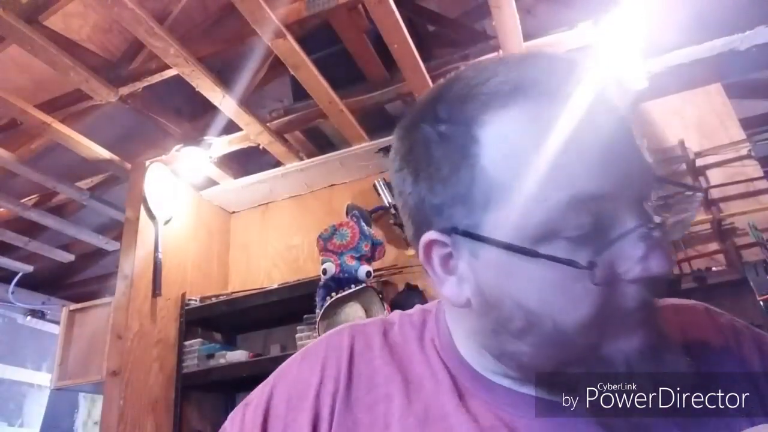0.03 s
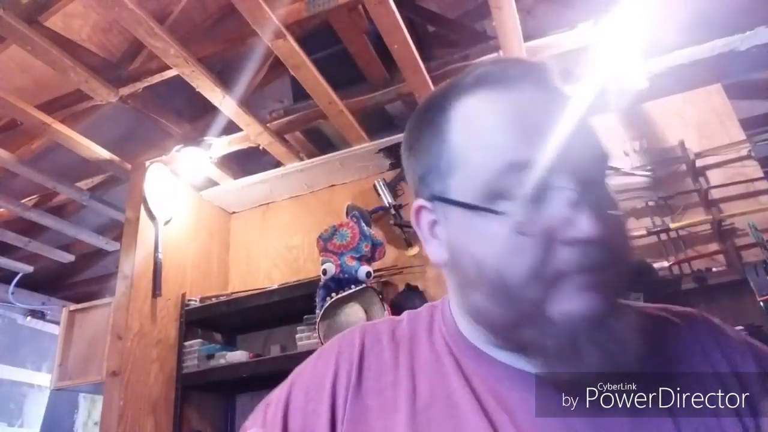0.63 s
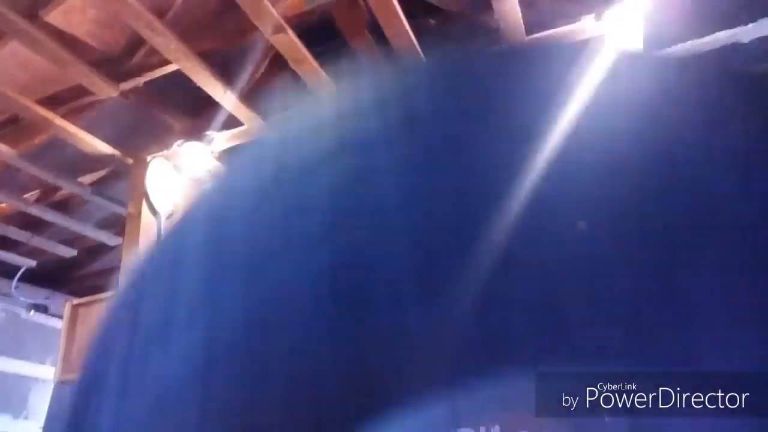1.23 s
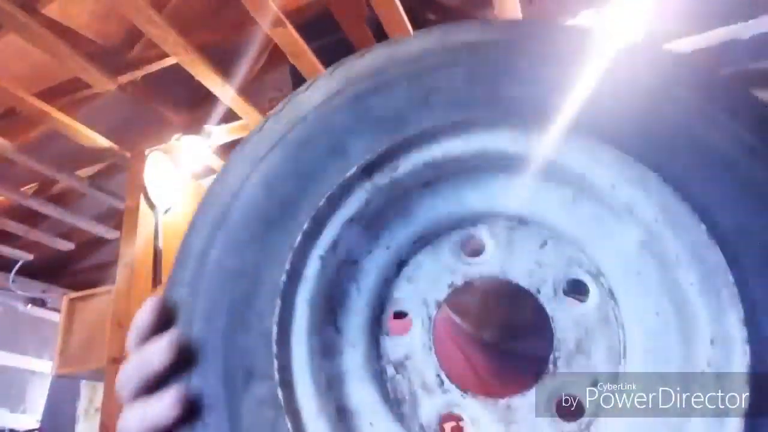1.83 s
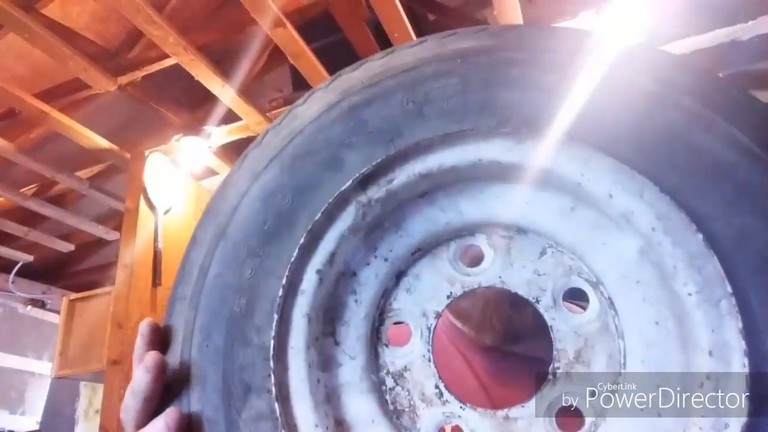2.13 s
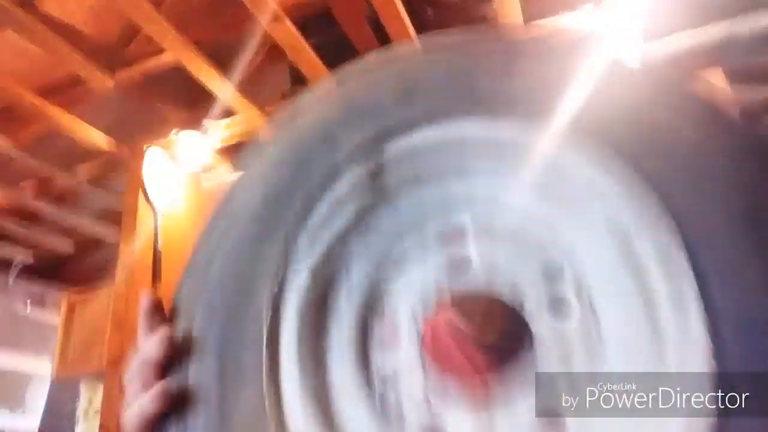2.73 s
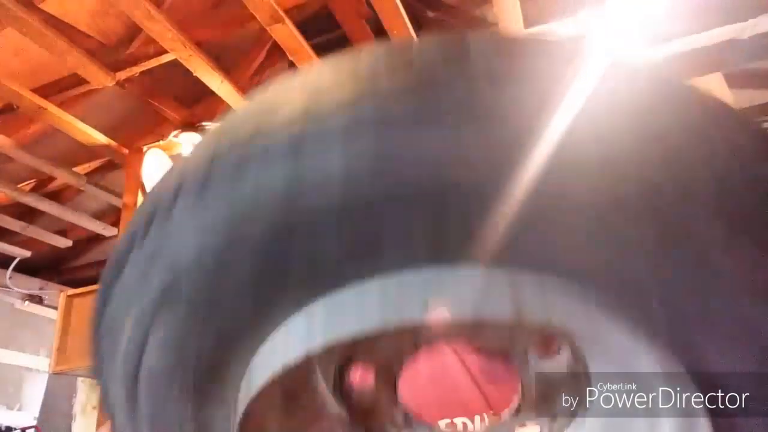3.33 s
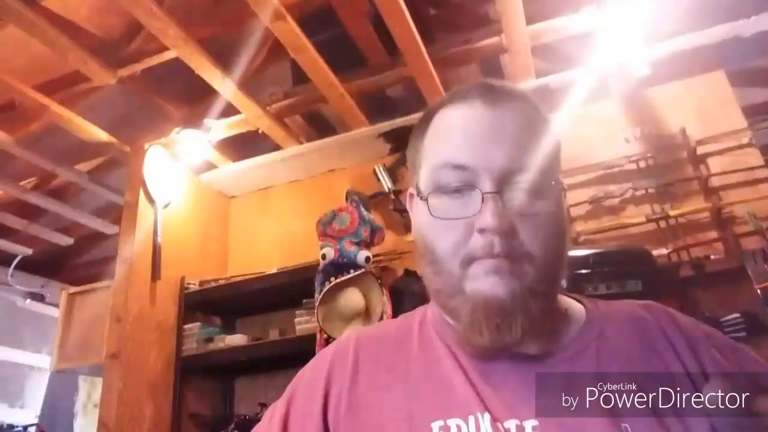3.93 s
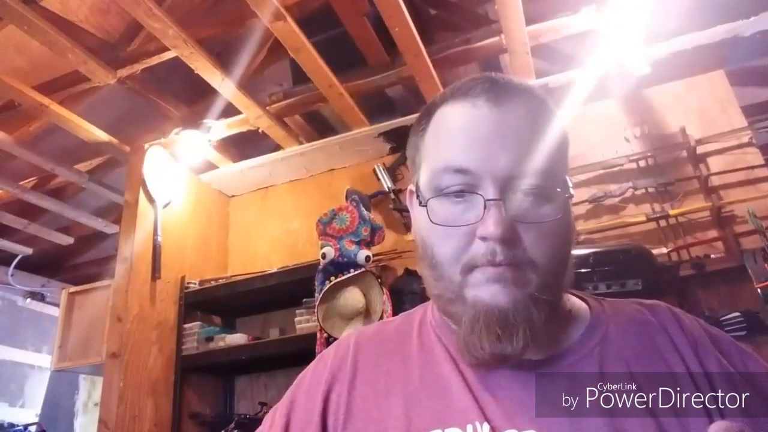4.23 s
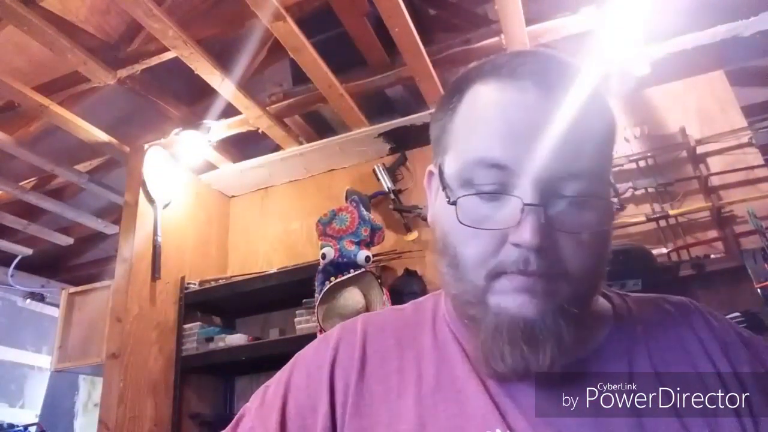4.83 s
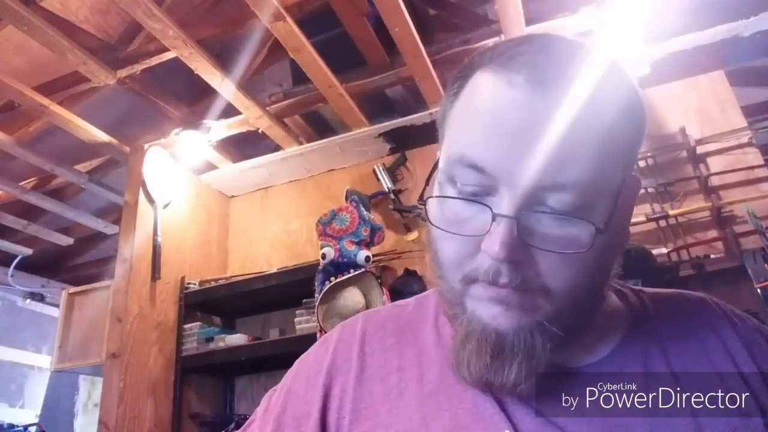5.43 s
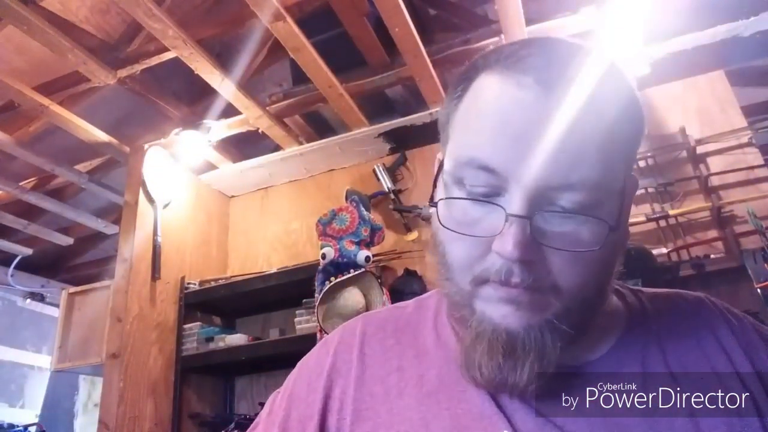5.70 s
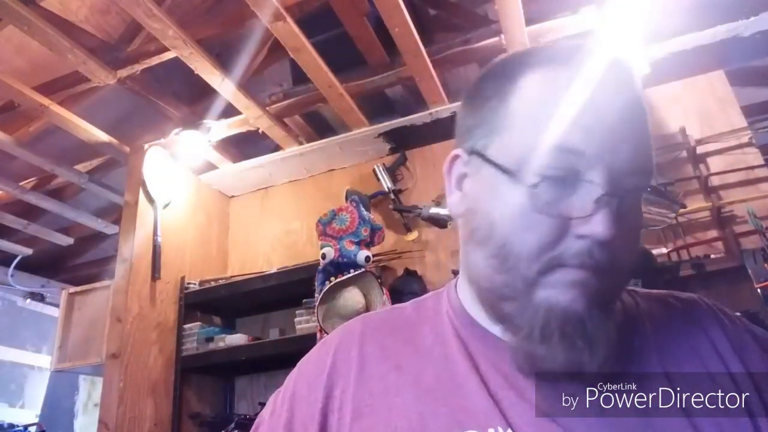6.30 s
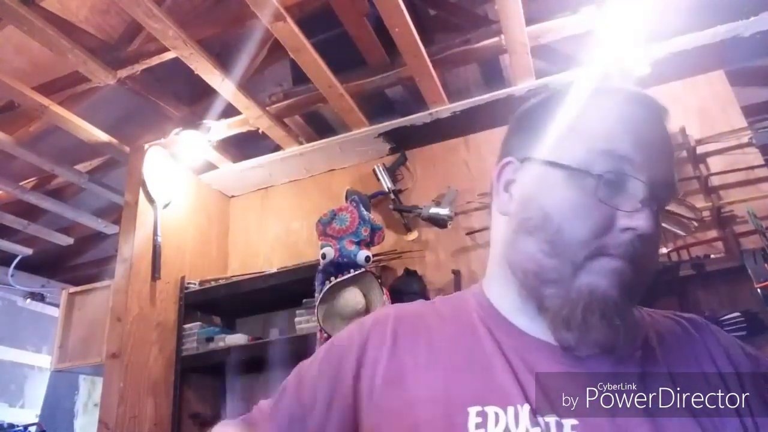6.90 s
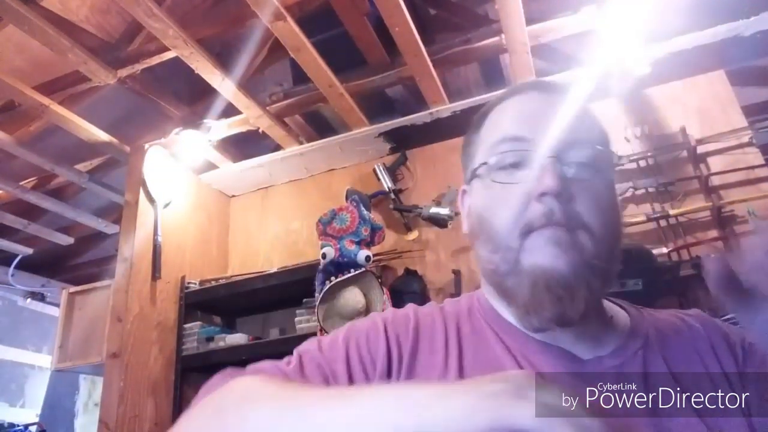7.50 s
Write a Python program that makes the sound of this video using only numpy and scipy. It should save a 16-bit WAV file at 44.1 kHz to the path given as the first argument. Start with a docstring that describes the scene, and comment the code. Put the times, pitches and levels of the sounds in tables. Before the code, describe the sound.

A fan hums steadily in a workshop with a short echo. Hands and a shirt rub and tick on a rubber tyre as a wheel is lifted. It bumps a wooden bench a few times, each a hard clack with a dull thud, then lands in a loud clatter that rattles small metal parts. Near the end the bench is knocked again. The stereo sound ducks briefly after the loud blows.

```python
"""A trailer wheel is lifted, bumped twice against a wooden bench and set down; later the bench is
knocked again. Each contact gives a hard clack, a ring of the bench top and a rubber thud, and heavy
ones shake small metal parts. Hands and a shirt rub on the tread. A pair of microphones hears it in a
workshop with a short echo, where a fan hums throughout; the recorder's gain control ducks everything
for about a second after a loud blow."""
import sys
import numpy as np
from scipy import signal
from scipy.fft import rfft, irfft, next_fast_len
from scipy.io import wavfile
from scipy.ndimage import uniform_filter1d, minimum_filter1d

SR = 44100
rng = np.random.default_rng(int(sys.argv[2]) if len(sys.argv) > 2 else 0)


def pcm_store(signal):
    """Save signal as 16-bit PCM."""
    levels = np.round(np.clip(np.atleast_2d(signal), -1, 1) * 32767)
    wavfile.write(sys.argv[1], SR, levels.astype(np.int16).T)


N = 337574
TIME = np.arange(N) / SR

# how alike fan and echo are at the two microphones: (frequency [Hz], coherence [0-1])
MIC_COHERENCE = [(60, 1), (130, 0.59), (290, 1), (640, 0.55), (1400, 0.31), (3000, 0), (8000, 0)]
# heavy blows that leave the bench juddering:
# (time [s], judder length [s], wheel landing [dB], chatter [dB], metal ring [dB])
HEAVY_BLOWS = [(1.7538, .032, -4, -18.5, -55), (2.8535, .046, -5.5, -14, -35), (3.974, .013, -1, -2, -11),
               (4.0157, 0.0098, -2, -18.5, -21.5), (4.043, 0.028, -10, -9.5, -13.5),
               (4.124, .028, -5, -15, -10.5), (4.185, .024, 0, -12.5, -17.5),
               (7.041, 0.03, -0.5, -9.5, -17), (7.11, 0.021, -13, -10.5, -17)]
AIRBORNE_S = 0.008   # whatever a blow throws up comes down this much later


def from_db(db):
    """Decibels to gain."""
    return 10 ** (np.asarray(db) / 20)


def rms_one(x):
    """Scale to unit power."""
    return x / np.sqrt(np.mean(x ** 2) + 1e-20)


def at_hz(table, hz, column=1):
    """Read a table on a log-frequency axis."""
    table = np.array(table)
    return np.interp(np.log(hz + 1e-9), np.log(table[:, 0]), table[:, column])


def low_pass(x, hz, order=2):
    """Causal Butterworth low-pass."""
    return signal.sosfilt(signal.butter(order, min(hz, SR / 2 - 1), fs=SR, output="sos"), x)


def high_pass(x, hz, order=2):
    """Causal Butterworth high-pass."""
    return signal.sosfilt(signal.butter(order, hz, "high", fs=SR, output="sos"), x)


def coloured(noise, spectrum):
    """Give a steady noise a spectrum; rms 1."""
    size = next_fast_len(N)
    gain = from_db(at_hz(spectrum, np.fft.rfftfreq(size, 1 / SR)))
    return rms_one(irfft(rfft(noise, size) * gain, size)[..., :N])


def drift(rate_hz):
    """A random curve that wanders at the given rate; rms 1."""
    knots = rng.standard_normal(4000)
    return rms_one(np.interp(TIME * rate_hz, np.arange(len(knots)), knots))


def grains(spread_db):
    """Stereo noise made of tiny slips of uneven size, 32 samples each."""
    noise = rng.standard_normal((2, N))
    sizes = np.repeat(rng.standard_normal(N // 32 + 1), 32)[:N]
    return noise * from_db(spread_db * sizes)


def burst(start, end, fade_s):
    """Starts at once, holds until the end, then dies away."""
    return (TIME >= start) * np.exp(-np.clip((TIME - end) / fade_s, 0, 40))


def swell(start, length, rise_s, fade_s):
    """Grows up to its start, holds for its length, then dies away."""
    away = np.maximum((start - TIME) / rise_s, (TIME - start - length) / fade_s)
    return np.exp(-np.clip(away, 0, 40))


def ring(force, modes):
    """Decaying sines set off by a force; neighbouring modes swing in opposite senses."""
    out = 0
    for k, (hz, db, t60) in enumerate(modes):
        radius, angle = from_db(-60 / (t60 * SR)), 2 * np.pi * hz / SR
        poles = [1, -2 * radius * np.cos(angle), radius * radius]
        out = out + (-1) ** k * from_db(db) * signal.lfilter([0, np.sin(angle)], poles, force + 1e-18)
    return out


def panned(x, left_db):
    """Make a sound left_db louder at the left microphone than at the right."""
    return x * from_db(np.array([[left_db], [-left_db]]) / 2)


def at_microphones(common, separate, hz):
    """Blend noise both microphones share with noise each has alone; the bass is most alike."""
    alike = np.clip(at_hz(MIC_COHERENCE, hz), 0, 1)
    return np.sqrt(alike) * common + np.sqrt(1 - alike) * separate


def fan(air_db=-34, waver_db=4.0, wander_rad=0.69, left_lag_s=0.00034):
    """Rushing air and wavering motor and blade tones, reaching the right microphone first."""
    # the moving air, low rumble and upper hiss: (frequency [Hz], relative density [dB])
    rumble = [(20, -19), (45, -29), (57, -20), (66, -4), (92, -3), (106, -6), (140, -5), (190, -11.5),
              (230, 0.5), (260, -10.5), (300, 1.5), (370, -10), (445, -15), (510, -8)]
    hiss = [(620, -12.5), (720, -15.5), (1000, -20.5), (1300, -23.5), (1800, -22), (2800, -29),
            (4500, -37.5), (7500, -42), (9500, -50.5), (15000, -48)]
    # motor and blade tones: (frequency [Hz], level [dB])
    tones = [(69, -55), (119, -61), (241.8, -41.5), (285.5, -47), (321, -50), (408, -57)]
    size = next_fast_len(N)
    direct, diffuse = rfft(rng.standard_normal(size)), rfft(rng.standard_normal((2, size)))
    white = irfft(at_microphones(direct, diffuse, np.fft.rfftfreq(size, 1 / SR)), size)[:, :N]
    air = from_db(air_db) * coloured(white, rumble + hiss)
    hum = 0
    for hz, db in tones:
        amplitude = np.sqrt(2) * from_db(db + waver_db * drift(rate_hz=6))
        hum = hum + amplitude * np.sin(2 * np.pi * hz * TIME + wander_rad * drift(rate_hz=4.5))
    left, right = air + hum
    return panned(np.array([np.roll(left, round(left_lag_s * SR)), right]), left_db=-1.4)


def workshop(x, build_s=0.0033, near_s=0.0039, near_db=-5, near_hz=600):
    """The direct sound, quick reflections off the bench, then a diffuse tail that dies band by band."""
    # the room's echo: (frequency [Hz], t60 [s], tail level [dB])
    room = [(60, 0.29, -9), (150, 0.19, -1), (403, 0.14, -4.5), (990, 0.3, -13.5), (3050, 0.18, -12.5),
            (11800, .12, -49)]
    t = TIME[:SR // 2]
    octave_edges = 35 * 2. ** np.arange(10)
    response = np.zeros((2, len(t)))
    for low, high in zip(octave_edges, octave_edges[1:]):
        hz = np.sqrt(low * high)
        band = signal.butter(2, [low, high], "band", fs=SR, output="sos")
        band_share = np.sqrt(2 * (high - low) / SR / len(t))
        noise = at_microphones(rng.standard_normal(len(t)), rng.standard_normal((2, len(t))), hz)
        tail = np.exp(-np.log(1000) * t / at_hz(room, hz)) * (1 - np.exp(-t / build_s))
        tail_gain = from_db(at_hz(room, hz, column=2))
        near = np.exp(-t / near_s)
        near_gain = from_db(near_db) * hz / (hz + near_hz)
        for shape, gain in (tail, tail_gain), (near, near_gain):
            response += gain * band_share * rms_one(signal.sosfilt(band, noise * shape))
    return x + signal.fftconvolve(x, response, axes=1)[:, :N]


def handling():
    """Skin and cloth slide over rubber in fine slips; short bright ticks come with grips and knocks."""
    # the shirt rustles as the wheel is moved: (start [s], length [s], level [dB])
    rustles = [(0.758, 1.15, -56), (2.84, 0.17, -59)]
    # hands and shirt slide on the tread: (start [s], length [s], bright rub [dB], dull scuff [dB])
    strokes = [(0.783, 0.079, -35, -54), (0.91, 0.023, -38.5, -45), (0.963, 0.082, -46.5, -41),
               (1.185, 0.044, -49, -33.5), (1.38, 0.025, -42, -68), (1.785, 0.038, -35, -62),
               (1.91, 0.058, -49, -64), (2.905, 0.016, -27, -65), (3.855, 0.071, -45.5, -66),
               (4.632, .075, -70, -35)]
    # ticks of hands on the tread, and sharp cracks as the wheel hits the bench: (time [s], level [dB])
    bright_ticks = [(0.732, -31), (.787, -20), (0.814, -22.5), (0.891, -21.5), (1.031, -15), (3.819, -33.5),
                    (3.936, -24), (3.956, -12), (3.968, -18), (4.628, -28), (4.703, -37), (7.0411, -17)]
    # bright and dull friction: (frequency [Hz], relative density [dB])
    rub_spectrum = [(300, 6.5), (900, -2), (2200, 0), (5000, -4.5), (10000, -9), (15000, -5)]
    scuff_spectrum = [(300, 3), (900, -1), (1600, -2.5), (3500, -14.5), (7000, -28), (15000, -36)]
    rub_level = sum(from_db(db) * swell(start, length, rise_s=0.07, fade_s=0.07)
                    for start, length, db in rustles)
    scuff_level = 0
    for start, length, rub_db, scuff_db in strokes:
        stroke = swell(start, length, rise_s=0.017, fade_s=0.012)
        rub_level = rub_level + from_db(rub_db) * stroke
        scuff_level = scuff_level + from_db(scuff_db) * stroke
    tick_level = sum(from_db(db) * burst(at, at, fade_s=0.0021) for at, db in bright_ticks)
    rub = rub_level * coloured(grains(spread_db=3.5), rub_spectrum)
    scuff = scuff_level * coloured(grains(spread_db=4.0), scuff_spectrum)
    ticks = tick_level * coloured(rng.standard_normal((2, N)), rub_spectrum)
    return panned(rub + scuff + ticks, left_db=2.5)


def loose_parts(rise_s=0.0032, metal_t60_s=0.07):
    """Loose parts chatter densely while the bench judders, and the metal ones ring on the left."""
    # modes of the small metal parts: (frequency [Hz], relative level [dB])
    metal_tones = [(2845, 4.5), (4735, -5), (5955, -1), (8933, 4.5), (10920, -12.5), (11820, -14),
                   (12815, -12), (13320, -11), (14950, -12)]
    # the chatter: (frequency [Hz], relative density [dB])
    chatter_spectrum = [(100, -1.5), (250, 6), (500, 5.5), (950, -3.5), (1500, -9), (2700, -16.5),
                        (4000, -22), (8000, -30.5), (15000, -47)]
    chatter_level, shake = 0, 0
    for at, length, _, chatter_db, metal_db in HEAVY_BLOWS:
        start = at + AIRBORNE_S
        chatter_level = chatter_level + from_db(chatter_db) * burst(start, start + length, fade_s=0.026)
        shake = shake + from_db(metal_db) * burst(start, start + length, fade_s=0.0016)
    chatter_level = uniform_filter1d(chatter_level, int(rise_s * SR) + 1)
    taps = grains(spread_db=-3.5)
    modes = [(hz, db, metal_t60_s) for hz, db in metal_tones]
    metal = ring(taps * shake, modes) / np.std(ring(taps[0], modes))
    buzz = from_db(-9 + 3.0 * drift(rate_hz=220))   # the parts buzz against each other
    chatter = chatter_level * coloured(grains(spread_db=4.5), chatter_spectrum)
    return panned(chatter, left_db=-0.5) + panned(metal * buzz, left_db=13)


def contacts():
    """Every knock, plus the wheel's soft landing as a judder starts and its settling as it ends."""
    # the wheel strikes the bench: (time [s], clack [dB], brightness [Hz], bench top [dB], thud [dB])
    strikes = [(1.7549, 2, 4700, -13.5, -22), (1.9230, -2, 3100, -16, -17.5),
               (2.0111, -11.5, 1880, -27, -16), (2.0788, -17.5, 1420, -38, -24.5),
               (2.8515, 2.5, 4260, -21, -5), (3.039, -3.5, 820, -21, -31), (3.1672, 0.5, 1700, -26, -12.5),
               (3.895, -13, 2760, -17.5, -7), (3.9353, -0.5, 3430, 1.5, 4), (3.9550, 3, 2280, -17, -10),
               (3.967, -9, 1800, -15, 0), (3.9785, -5, 1200, 2.5, -6), (4.0124, 11, 2100, 3, 5.5),
               (4.047, 8.5, 1620, 12.5, 7), (4.0844, 6.5, 1280, 8, -2), (4.1254, 10, 1800, 9, 5),
               (4.1860, 9.5, 1960, 13.5, 1), (4.6269, -13, 2600, -28, -37), (7.0412, -11.5, 9200, 6, -3.5),
               (7.1103, 7, 1610, 7.5, 1), (7.1544, -1, 1300, 8, -2), (7.1852, -2.5, 1240, 1, -3.5)]
    # relative to the blow's landing level: (clack [dB], brightness [Hz], bench top [dB], thud [dB])
    landing, settling = (-1.5, 2205, -4, 2.5), (-1.5, 998, -4, -1)
    rows = list(strikes)
    for at, length, db, _, _ in HEAVY_BLOWS:
        for after, (clack_db, bright_hz, bench_db, thud_db) in (0, landing), (length, settling):
            rows.append((at + AIRBORNE_S + after, db + clack_db, bright_hz, db + bench_db, db + thud_db))
    return rows


def wheel_knocks(thud_cutoff_hz=260, bench_cutoff_hz=1300, spot_db=2.06, edge_db=3, edge_hz=650):
    """Each blow rings the bench top and the tyre, and clacks with its own loudness and brightness."""
    # modes of the contact, the wooden top and the tyre: (frequency [Hz], level [dB], t60 [s])
    clack_modes = [(659, -26, 0.075), (807, -9, 0.018), (940, -9.5, 0.025), (1125, -19.5, 0.039),
                   (1396, -8, 0.013), (1515, -7, 0.0094), (1745, -12, 0.012), (2130, -11, 0.0072),
                   (2580, -13.5, 0.0094), (2830, -14.5, 0.0076), (3300, -24, 0.0074), (3960, -30, 0.0088),
                   (6260, -48, 0.0027)]
    bench_modes = [(237, -8, 0.059), (280.5, -10.5, 0.17), (379, -5.5, 0.032), (455.5, -4.5, 0.044),
                   (540, -13, 0.046), (567, -12, 0.07), (615, -15.5, 0.028), (783, -25, 0.069)]
    tyre_modes = [(55.8, 0, 0.074), (81.5, -2, 0.18), (118, -2.5, 0.08), (151.6, -6.5, 0.087)]
    clack_force, bench_force, tyre_force = np.zeros((3, N))
    click = signal.unit_impulse(SR // 100)
    for at, clack_db, bright_hz, bench_db, thud_db in contacts():
        i = round(at * SR)
        clack_force[i:i + len(click)] += from_db(clack_db) * low_pass(click, bright_hz, order=5)
        bench_force[i] += from_db(bench_db)
        tyre_force[i] += from_db(thud_db)
    bench = 0
    for k, mode in enumerate(bench_modes):
        spot_gain = from_db(spot_db * rng.standard_normal(N))   # each spot struck favours other modes
        bench = bench + (-1) ** k * ring(bench_force * spot_gain, [mode])
    # the first edge of the blow reaches the microphones before anything rings
    edge = from_db(edge_db) * high_pass(clack_force, edge_hz)
    clack = panned(edge, left_db=-5.0) + panned(ring(clack_force, clack_modes), left_db=7.0)
    wood = panned(low_pass(bench, bench_cutoff_hz), left_db=-0.2)
    thud = ring(low_pass(tyre_force, thud_cutoff_hz), tyre_modes)
    return clack + wood + thud


def scene():
    """Blows, rattles and handling in the workshop, over the fan."""
    return workshop(wheel_knocks() + loose_parts() + handling()) + fan()


def gain_control(x, limit_db=-6.5, hold_s=0.91, release_db_per_s=32, sense_s=0.00382):
    """Loud sound turns the gain down at once; it stays down for a while, then climbs back."""
    power = uniform_filter1d(np.mean(x ** 2, axis=0), int(sense_s * SR))
    over_db = np.maximum(10 * np.log10(np.abs(power) + 1e-12) - limit_db, 0)
    half = int(hold_s * SR / 2)
    held_db = -minimum_filter1d(-over_db, 2 * half + 1, origin=half, mode="constant")
    release_db = release_db_per_s * TIME
    cut_db = np.maximum.accumulate(held_db + release_db) - release_db
    return x * from_db(-cut_db)


def record(dry, low_cut_hz=38, high_cut_hz=15600):
    """Microphone bass cut, then the recorder's gain control, rounded peaks and steep treble cut."""
    heard = high_pass(dry, low_cut_hz, order=6)
    rounded = np.tanh(gain_control(heard))
    return signal.sosfilt(signal.ellip(10, .1, 80, high_cut_hz, fs=SR, output="sos"), rounded)


dry = scene()
out = record(dry)
pcm_store(out)
```